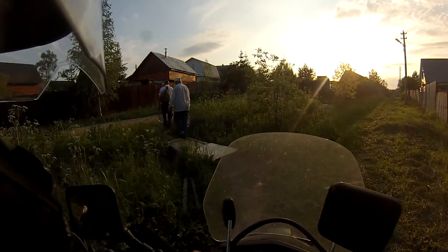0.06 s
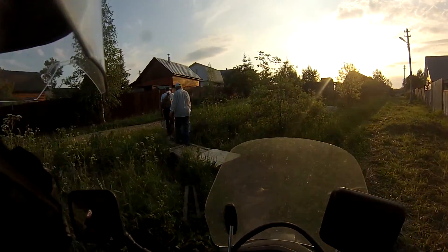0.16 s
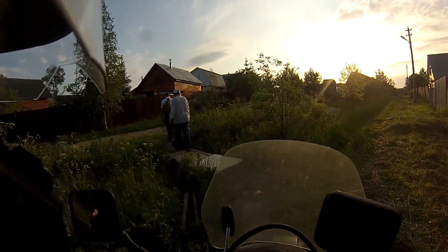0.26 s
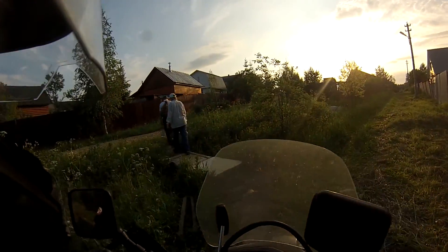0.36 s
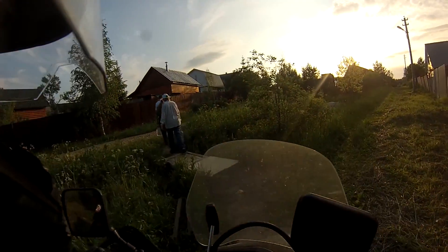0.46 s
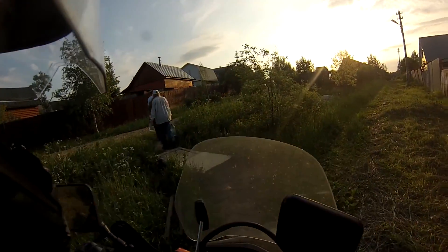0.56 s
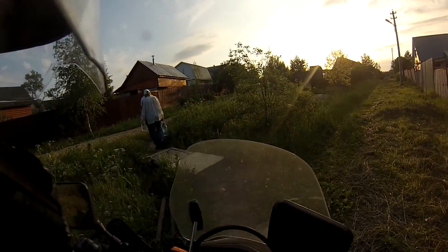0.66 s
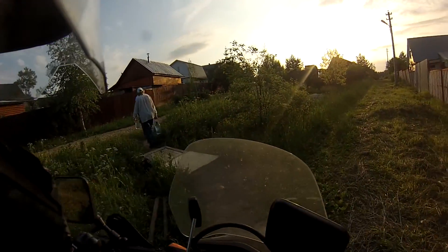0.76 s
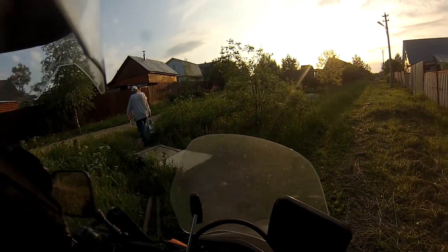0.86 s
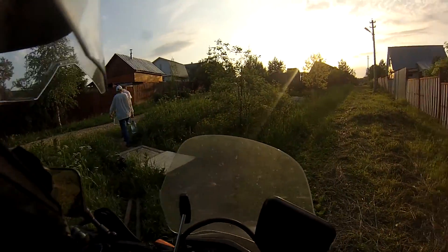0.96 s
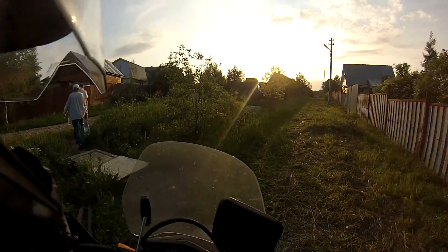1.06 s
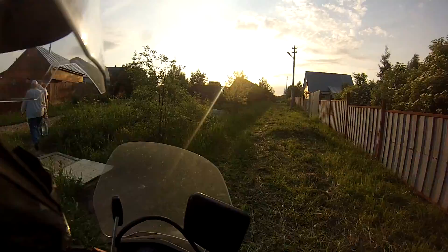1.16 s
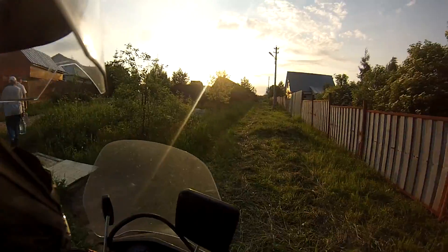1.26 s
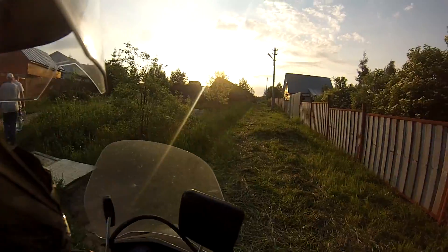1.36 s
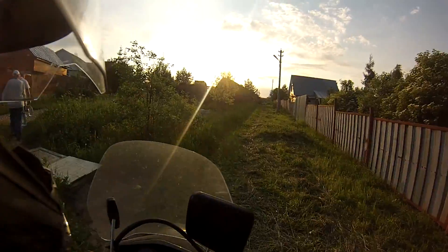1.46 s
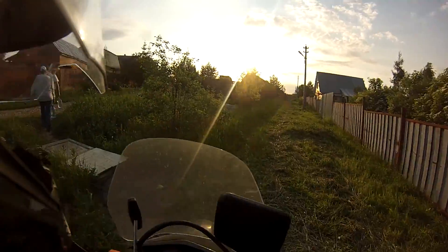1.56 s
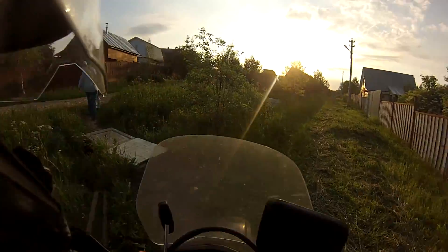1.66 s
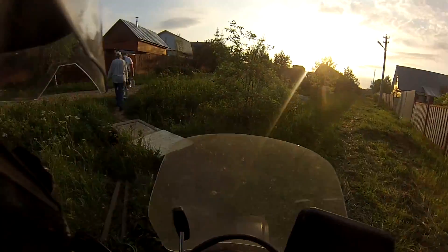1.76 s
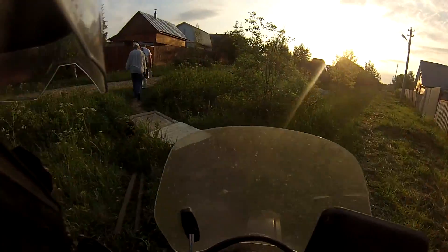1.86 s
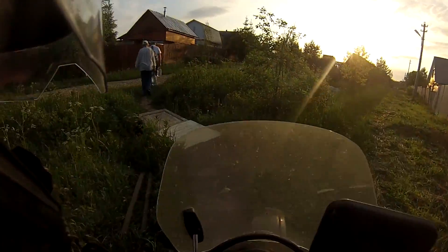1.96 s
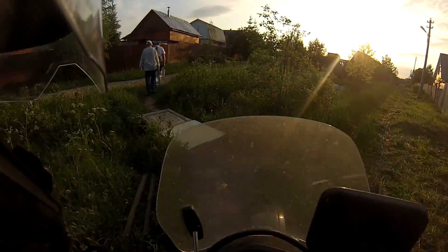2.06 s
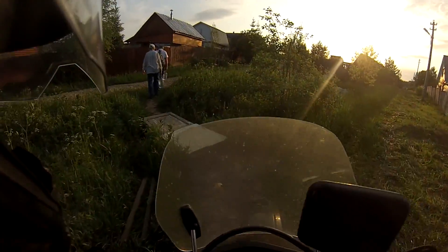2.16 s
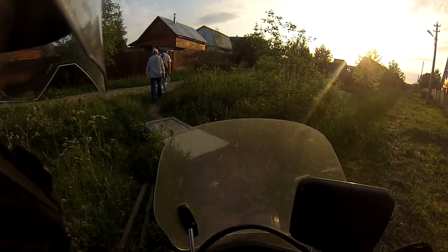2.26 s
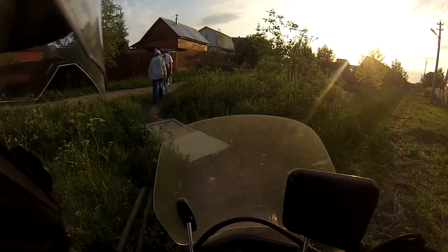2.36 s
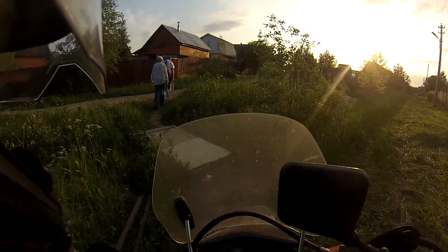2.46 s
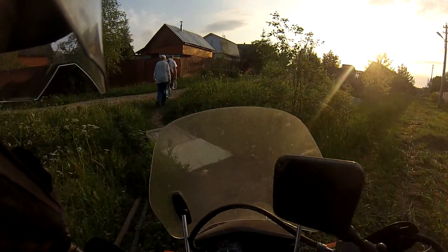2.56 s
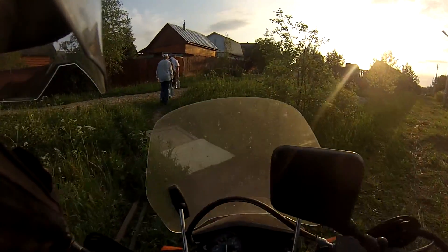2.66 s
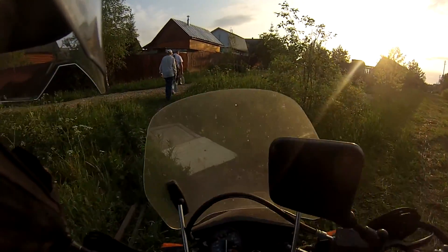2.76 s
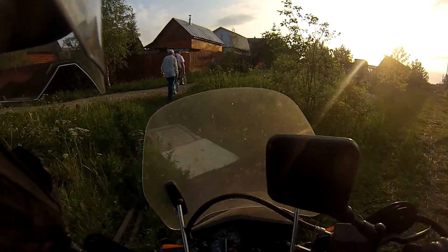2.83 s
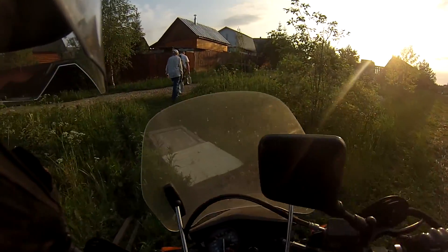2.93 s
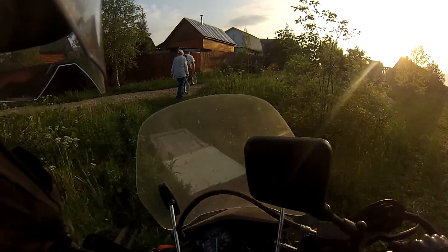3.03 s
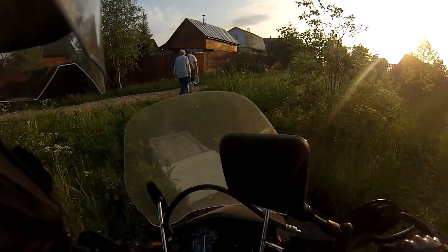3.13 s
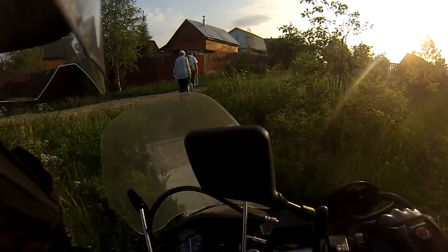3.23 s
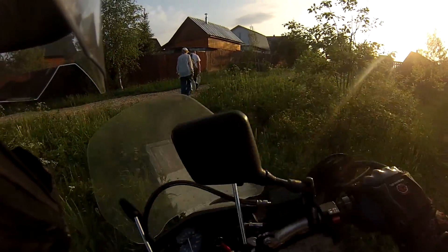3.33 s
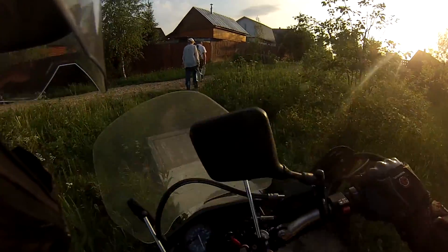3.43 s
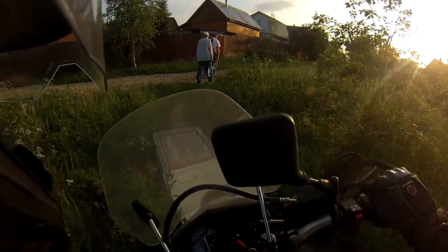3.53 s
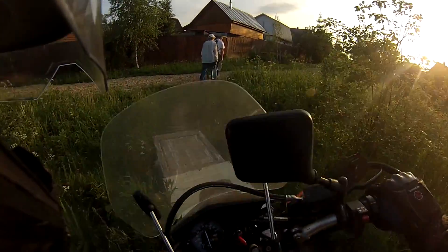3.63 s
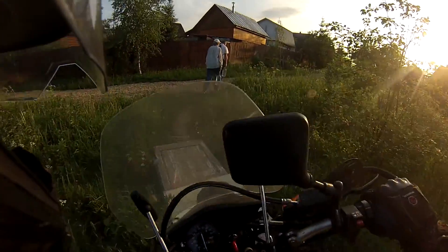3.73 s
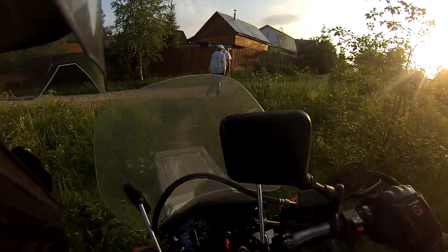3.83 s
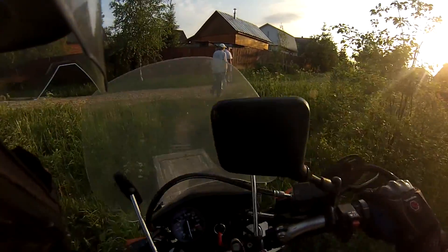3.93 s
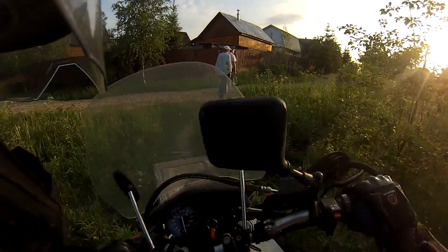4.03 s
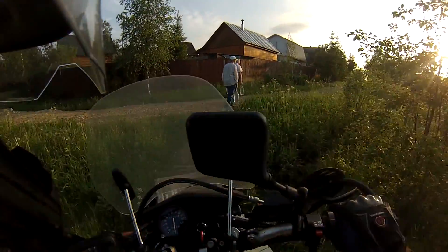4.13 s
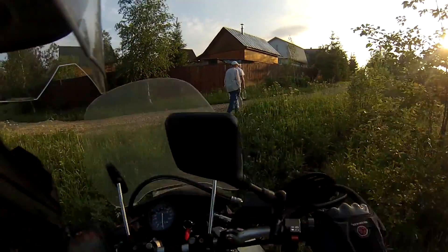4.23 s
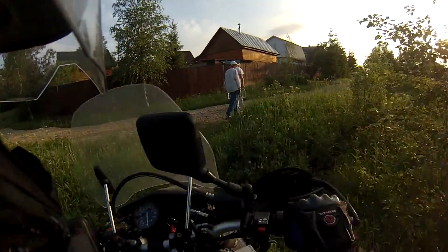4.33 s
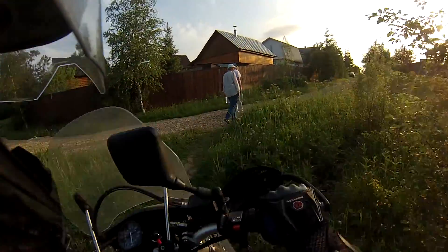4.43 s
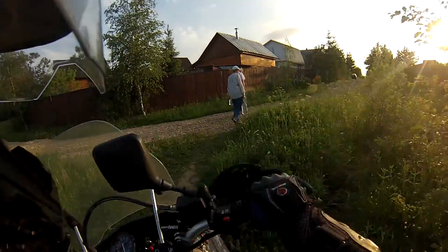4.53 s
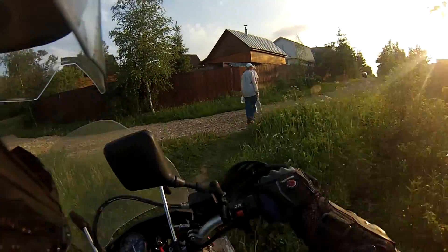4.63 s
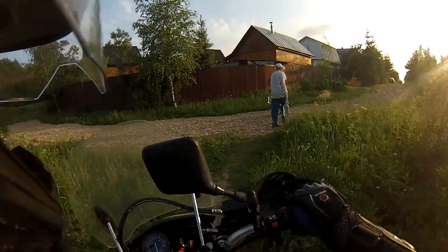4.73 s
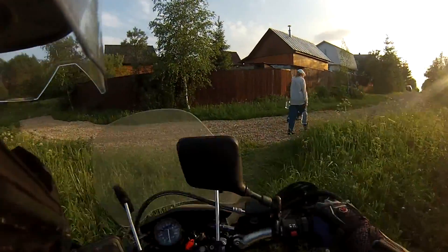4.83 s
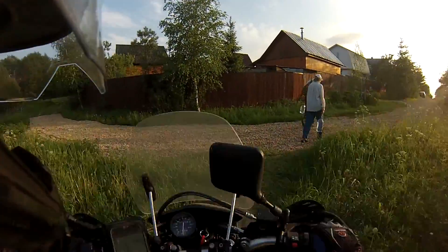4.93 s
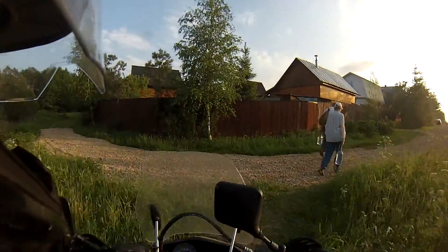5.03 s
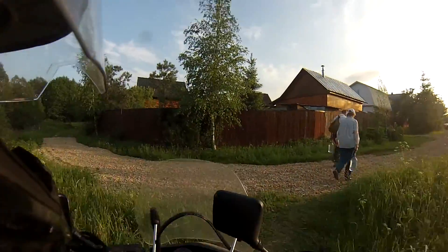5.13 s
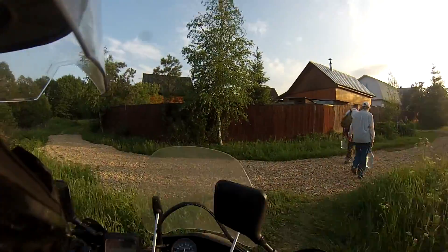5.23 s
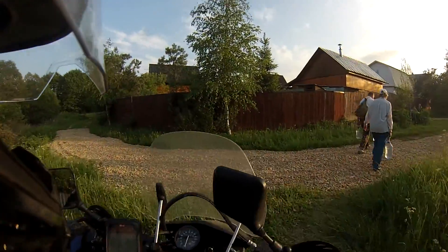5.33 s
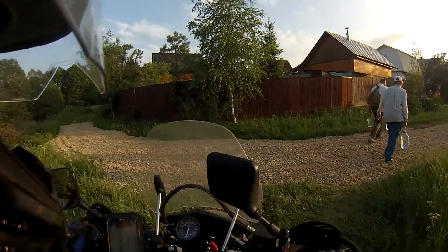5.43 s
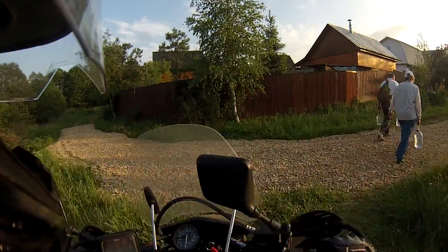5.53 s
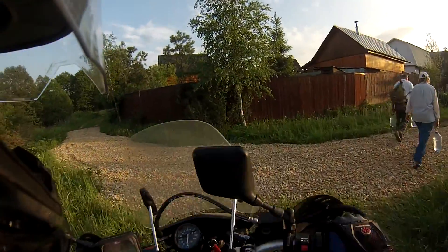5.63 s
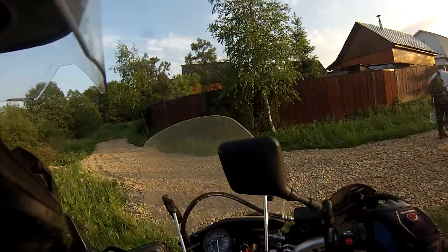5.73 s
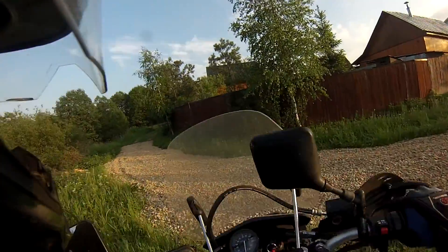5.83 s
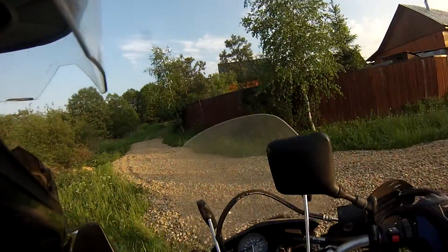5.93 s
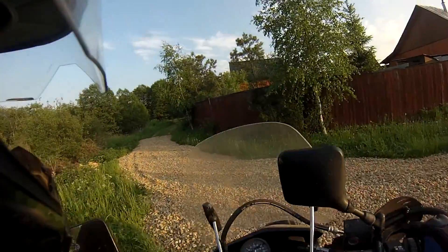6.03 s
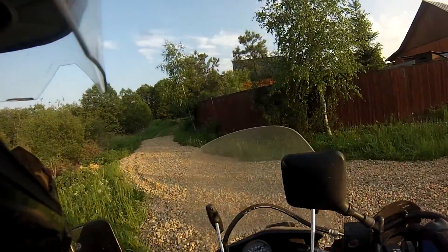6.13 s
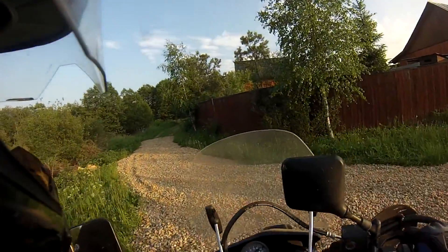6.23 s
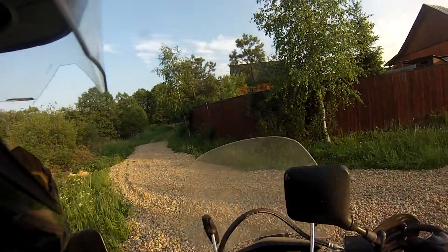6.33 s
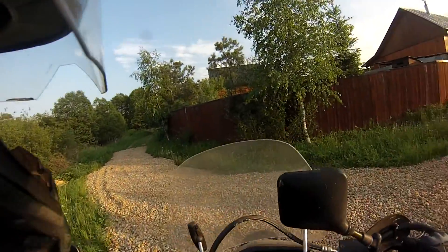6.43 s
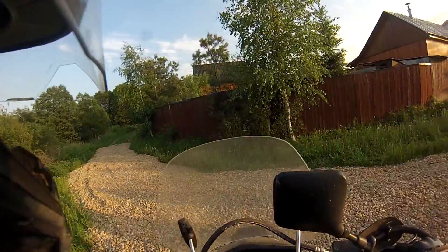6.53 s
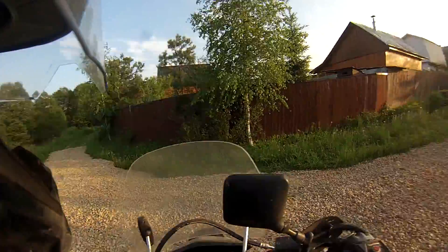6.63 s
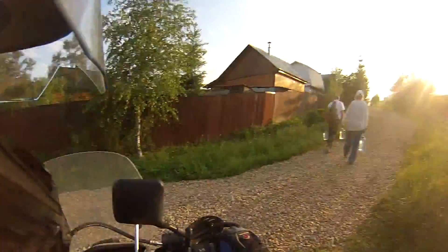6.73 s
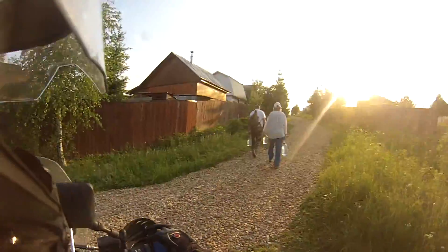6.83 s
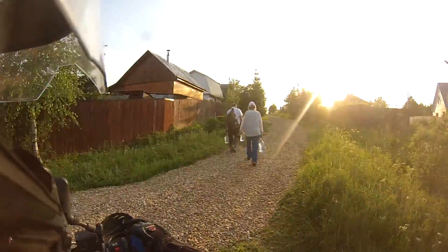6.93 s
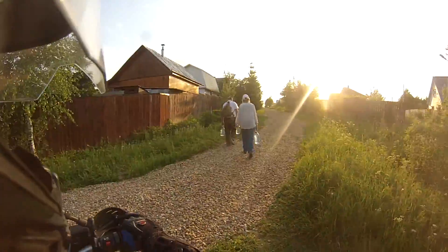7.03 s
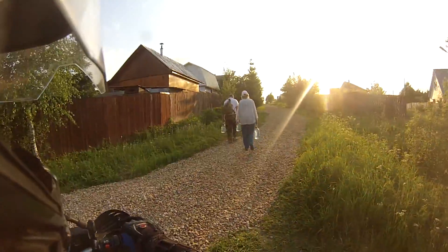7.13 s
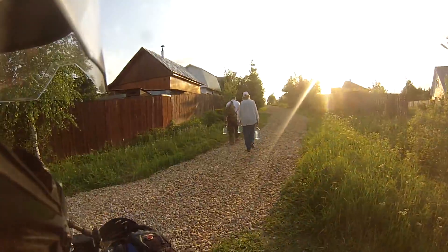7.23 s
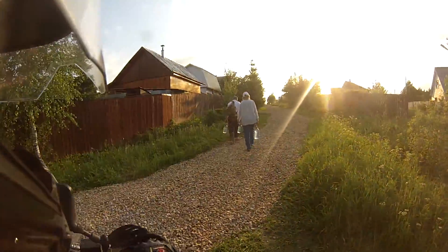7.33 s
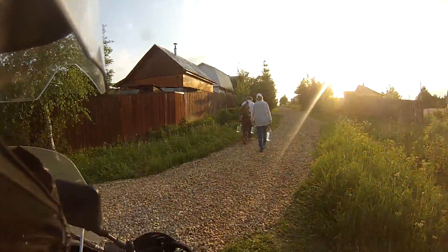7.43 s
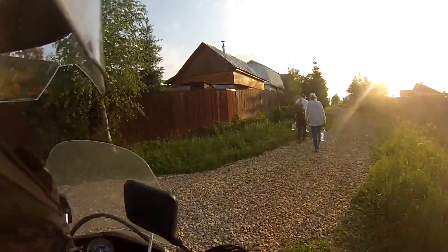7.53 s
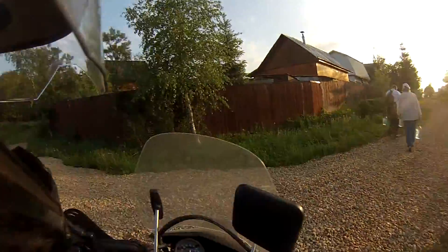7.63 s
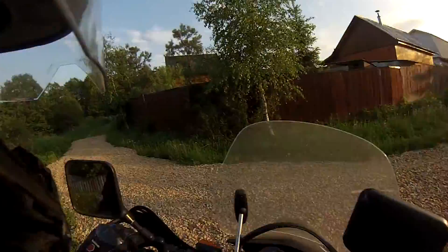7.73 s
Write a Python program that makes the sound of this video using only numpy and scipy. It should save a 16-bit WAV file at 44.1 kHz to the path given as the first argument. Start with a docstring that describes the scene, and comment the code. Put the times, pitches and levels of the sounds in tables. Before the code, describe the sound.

Close at the rider's helmet, a thumping single-cylinder engine idles, surges over rutted ground, then settles to a slow putter with two scraping brake squeezes.

```python
"""A single-cylinder four-stroke motorcycle idles over a grass track, heard close up at the rider's helmet.
It takes throttle twice to climb a bank, with thumps from the ruts, and meets gravel as the second pull begins.
It then drops below idle speed, creeps on, and is braked twice with a dry rub before rolling again.
Pulses once a cycle ring as exhaust and knock; shaped noise makes clatter, hiss, throttle roar and rub;
bumps swell a low rumble, and short blows ring the camera case as clicks."""
import sys
import numpy as np
from scipy import signal
from scipy.fft import rfft, irfft, next_fast_len
from scipy.io import wavfile
from scipy.ndimage import uniform_filter1d

SR = 44100
rng = np.random.default_rng(int(sys.argv[2]) if len(sys.argv) > 2 else 0)


def file_out(sig):
    """Save sig as 16-bit WAV at sys.argv[1]."""
    # one column per channel
    cols = np.atleast_2d(sig).T
    # limit, then scale
    lim = np.clip(cols, -1, 1)
    pcm = np.round(lim * 32767).astype(np.int16)
    wavfile.write(sys.argv[1], SR, pcm)


N = 343539
TIME = np.arange(N) / SR
IDLE_RATE = 13.7  # firings per second

# engine speed: t/s, firing rate/Hz
FIRING_RATE = [(0.0, 13.46), (0.45, 13.89), (0.8, 13.6), (1.0, 13.38), (1.25, 13.72), (1.7, 16.37),
               (1.9, 16.48), (2.2, 15.09), (2.55, 15.09), (3.05, 15.17), (3.22, 17.94), (3.44, 15.81),
               (3.56, 20.9), (3.66, 25.11), (3.78, 25.96), (3.92, 24.91), (4.1, 22.07), (4.31, 19.23),
               (4.4, 22.13), (4.5, 25.0), (4.62, 22.78), (4.77, 19.48), (4.92, 11.91), (5.2, 12.21),
               (5.45, 12.84), (5.65, 14.28), (5.95, 13.17), (6.2, 13.36), (6.5, 13.34), (6.78, 13.9),
               (7.05, 13.68), (7.5, 13.73), (7.79, 14.69)]
# load on the engine: t/s, load (0 idling, 1 pulling hard, below 0 coasting with the throttle shut)
ENGINE_LOAD = [(0, 0.1), (1.0, -0.068), (1.6, 0.55), (2.4, 0.52), (3.16, 0.62), (3.42, -0.94), (3.51, 0.79),
               (3.8, 0.58), (4.0, 0.85), (4.17, 0.92), (4.33, 0.84), (4.56, 0.73), (4.76, 0.94),
               (4.92, -0.17), (5.1, -0.12), (6.6, -0.18), (7.79, 0.11)]
# slap of the piston: t/s, level/dB before the softness correction, ring of the cylinder f/Hz
PISTON_SLAP = [(0, -49, 1580), (0.45, -49, 1530), (1.0, -59.5, 1430), (1.6, -44, 1436), (1.9, -42, 1490),
               (2.1, -42, 1490), (2.25, -37.5, 1488), (2.48, -38, 1496), (2.62, -39.5, 1507),
               (2.85, -36.5, 1503), (3.16, -39, 1507), (3.3, -57, 1400), (3.48, -47, 1450),
               (3.55, -35.5, 1514), (3.7, -42, 1456), (3.88, -42, 1480), (4.0, -37, 1500),
               (4.2, -36.5, 1520), (4.33, -39.5, 1540), (4.45, -42.5, 1490), (4.65, -47, 1460),
               (4.76, -39, 1430), (4.92, -51, 1460), (5.2, -63, 1470), (7.79, -57, 1440)]


def amp(db):
    """Decibels to gain."""
    return 10 ** (np.asarray(db) / 20)


def unit(x):
    """Scales to an rms of 1."""
    return x / np.sqrt(np.mean(x ** 2) + 1e-20)


def curves(rows):
    """Each column of a table, joined by straight lines in time."""
    s, *columns = np.transpose(rows)
    return [np.interp(TIME, s, column) for column in columns]


def read_db(points, hz):
    """A spectrum, joined by straight lines on a log axis."""
    f, db = np.transpose(points)
    return np.interp(np.log(hz + 1), np.log(f + 1), db)


def add(mix, s, sound):
    """Mixes a sound in at time s."""
    part = mix[max(round(s * SR), 0):][:len(sound)]
    part += sound[:len(part)]


def white():
    """Fresh white noise."""
    return rng.standard_normal(N)


def coloured(x, points):
    """Gives x a spectrum; rms 1."""
    size = next_fast_len(N)
    gain = amp(read_db(points, np.fft.rfftfreq(size, 1 / SR)))
    return unit(irfft(rfft(x, size) * gain, size)[:N])


def ringing(x, points, size=16384):
    """Gives pulses a spectrum causally (minimum phase), so that they ring only afterwards; rms 1."""
    log_gain = np.log(amp(read_db(points, abs(np.fft.fftfreq(size, 1 / SR)))))
    spectrum = np.exp(np.conj(signal.hilbert(log_gain)))
    response = np.fft.ifft(spectrum).real[:size // 2]
    return unit(signal.oaconvolve(x, response)[:N])


def resonate(x, hz, width):
    """A resonance of gain 1 at hz, which may move: shift down to zero, smooth, shift back."""
    turn = np.exp(2j * np.pi * np.cumsum(hz * np.ones(len(x))) / SR)
    r = np.exp(-np.pi * width / SR)
    return 2 * (turn * signal.lfilter([1 - r], [1, -r], x / turn)).real


def band(x, hz, width, order=2):
    """A fixed resonance, applied order times for steeper sides."""
    b, a = signal.iirpeak(hz, hz / width, SR)
    for _ in range(order):
        x = signal.lfilter(b, a, x)
    return x


def firing_rate():
    """Firings per second over time."""
    return curves(FIRING_RATE)[0]


def crank(start=0.57):
    """Engine cycles turned so far; the charge fires at whole numbers."""
    return start + np.cumsum(firing_rate()) / SR


def revs():
    """How far the engine is revved, 0-1: the idle colour gives way between two firing rates in Hz."""
    return np.interp(firing_rate(), (16.16, 21.4), [0, 1])


def throttle():
    """How far the throttle is open beyond a gentle pull, 0-1, read from the load."""
    return np.interp(curves(ENGINE_LOAD)[0], (0.53, 0.92), [0, 1])


def level(idle_db, load_db=0, octave_db=0):
    """Level in dB of an engine part: so much at idle, more with load and with each doubling of speed."""
    return idle_db + load_db * curves(ENGINE_LOAD)[0] + octave_db * np.log2(firing_rate() / IDLE_RATE)


def halted(start_s=6.88, end_s=7.68, fade_s=0.035):
    """1 while the bike is held almost still, 0 while it rolls."""
    return np.clip(np.minimum(TIME - start_s, end_s - TIME) / fade_s, 0, 1)


def pulses(cycle, lag, spread_db):
    """One pulse a cycle, lag cycles after the firing, each of its own strength."""
    at = np.flatnonzero(np.diff(np.floor(cycle - lag)) > 0)
    train = np.zeros(N)
    strength = amp(spread_db * rng.standard_normal(len(at)))
    train[at] = strength / np.sqrt(firing_rate()[at])  # faster firing adds no mean power
    return train


def gate(cycle, lag, length):
    """Opens lag cycles after each firing and dies away over length cycles."""
    age = (cycle - lag) % 1 / length
    return age * np.exp(1 - age)


def echoes(train, colour, decay_s):
    """Every pulse meets the same dense echoes inside a metal body: harmonics glide with the engine speed."""
    t = np.arange(SR // 12) / SR
    reflections = rng.standard_normal(len(t)) * np.exp(-t / decay_s)
    return ringing(signal.oaconvolve(train, reflections)[:N], colour)


def cylinder(train, width_hz, order):
    """Rings the finned cylinder, whose pitch drifts; rms 1."""
    ring_hz = curves(PISTON_SLAP)[1]
    for _ in range(order):
        train = resonate(train, ring_hz, width_hz)
    return unit(train)


def exhaust(cycle, idle_hz=216, rise_hz_per_firing=4.15, echo_s=0.01916, spread_db=0.4):
    """Puffs thud and echo in the silencer; the pipe barks, its pitch raised by hotter gas at speed."""
    # deep part of one pulse: f/Hz, relative level/dB at idle, relative level/dB when revving
    thud_colour = [(14.3, -32, -11), (28.6, -32, -17), (52, 8, 5.5), (70.4, 3, -27), (89.5, 2.5, 2.5),
                   (93.7, 2, -0.5), (99.3, 8.5, 5), (105, 2.5, 7), (108.6, 0.5, 7.5), (133.8, -27.5, -19),
                   (170.3, -10.5, -31), (403, -59, -73)]
    # echoes inside the silencer: f/Hz, relative level/dB
    silencer_colour = [(150, -23), (300, -20), (375, -7), (440, 1.5), (540, 0), (700, -12), (1000, -10),
                       (1500, -7.5), (3000, -35)]
    # slow swells of the exhaust bark: t/s, level/dB
    bark_swell = [(0, -5), (1.3, -0.5), (3.1, -2), (3.6, 1.5), (4.1, 0.5), (4.45, 0), (4.79, 0),
                  (4.88, -10.5), (5.2, -1.5), (6.5, 0.5), (7.79, 1.5)]
    rev = revs()
    thud_db = level(idle_db=-42.0, load_db=5.5)
    bark_db = level(idle_db=-57.5, load_db=6.0, octave_db=5.5) + curves(bark_swell)[0]

    puffs = pulses(cycle, lag=0.191, spread_db=spread_db)
    idling = ringing(puffs, [(hz, db) for hz, db, _ in thud_colour])
    pulling = ringing(puffs, [(hz, db) for hz, _, db in thud_colour])
    thud = (1 - rev) * idling + rev * pulling

    pipe_hz = idle_hz + rise_hz_per_firing * (firing_rate() - IDLE_RATE)
    cracks = pulses(cycle, lag=0.1565, spread_db=spread_db)
    pipe = unit(resonate(resonate(cracks, pipe_hz, 47), pipe_hz, 106))
    bark = pipe - amp(-8.0) * unit(band(cracks, 175.0, 69))
    echo = amp(-27.0) * (1 - rev) * np.interp(TIME - echo_s, TIME, bark)

    blowdown = pulses(cycle, lag=0.33, spread_db=spread_db)
    rasp = amp(-16 + 9.5 * rev) * echoes(blowdown, silencer_colour, decay_s=0.01)
    return amp(thud_db) * thud + amp(bark_db) * (bark + echo + rasp)


def knock(cycle, hard_db=-40, cover_hz=2170, spread_db=1.2):
    """Combustion thumps the block and slaps the piston once a cycle: ring, rebounds, rattling tail."""
    # colour of the engine block: f/Hz, relative level/dB
    block_colour = [(200, -31), (420, -2.5), (560, -0.5), (760, -1), (1000, -6), (1400, -8.5), (2500, -26),
                    (5000, -41)]
    knock_db, rev = curves(PISTON_SLAP)[0], revs()
    softness = np.clip(hard_db - knock_db, 0, 15)  # dB; a soft slap leaves mostly the tail

    slaps = pulses(cycle, lag=-0.054 - 0.0345 * rev, spread_db=spread_db)
    rebounds = amp(-10.0) * pulses(cycle, lag=0.09, spread_db=spread_db)
    rebounds = rebounds + amp(-9) * rev * pulses(cycle, lag=0.28, spread_db=spread_db)
    ring = cylinder(slaps + rebounds, width_hz=236, order=4)
    ring = ring + amp(-7.0) * throttle() * unit(band(slaps, cover_hz, 104, order=3))

    tail = unit(band(white() * (gate(cycle, lag=0.12, length=0.13) + 0.17), 1453, 216))
    thumps = pulses(cycle, lag=-0.0796, spread_db=spread_db)
    block = echoes(thumps, block_colour, decay_s=0.0044)

    out = amp(knock_db - 9.0 - 0.76 * softness) * ring
    out = out + amp(knock_db - 14.0 + 0.54 * softness) * tail
    return out + amp(level(idle_db=-68.5, octave_db=11)) * block


def clatter(cycle, valve_hz=2150, rise_hz=65, tap_spread_db=1.5):
    """Valves and gears tap the cases twice a cycle over a gas rush; throttle and revs ring the valve cover."""
    # ringing of the cylinder and cases: f/Hz, half the width/Hz of each filter pass, relative level/dB
    case_modes = [(559, 58, 0.5), (750, 35, 7.5), (970, 82, -3), (1303, 131, 6.5), (1437, 62, 5.5),
                  (2273, 117, -1), (2600, 210, -24), (3094, 145, -8.5)]
    # gas rush and tyres: f/Hz, relative level/dB per Hz
    rush_colour = [(120, 1.5), (300, 0.5), (390, -5.5), (480, -3.5), (620, -13), (800, -8.5), (1100, -5),
                   (1500, -4), (1900, -17), (2600, -14), (3600, -18.5), (8000, -57)]
    rev = revs()
    clatter_db = level(idle_db=-61.5, octave_db=7.5) - 3 * halted()

    beat = 0.81 * gate(cycle, lag=-0.057, length=0.043) + 1.18 * gate(cycle, lag=0.428, length=0.035)
    cycle_strength = amp(3.4 * rng.standard_normal(int(cycle[-1]) + 1))
    beat = beat * cycle_strength[cycle.astype(int)]  # no two cycles rattle alike
    taps = white() * amp(tap_spread_db * np.minimum(rng.exponential(1, N), 4))
    cases = unit(sum(amp(db) * band(taps * (0.5 + beat), hz, 2 * width) for hz, width, db in case_modes))

    cover_hz = valve_hz + rise_hz * rev
    cover = unit(resonate(resonate(white() * (0.43 + beat), cover_hz, 150), cover_hz, 150))
    rush = coloured(white() * (1 + 1.5 * gate(cycle, lag=0.352, length=0.035)), rush_colour)

    parts = amp(3.5 - 1.3 * rev) * cases
    parts = parts + amp(-6.5 + 10 * np.maximum(rev, throttle())) * cover
    parts = parts + amp(5.5 - 0.32 * rev) * rush
    return amp(clatter_db) * parts


def hiss(cycle):
    """Chain and grass hiss, more at speed and over bumps; a thin valve-seat tick; steady high background noise."""
    # fine hiss of chain and grass: f/Hz, relative level/dB per Hz
    hiss_colour = [(1000, -22), (2800, 3), (3700, -0.5), (4900, 5.5), (5900, 1.5), (6600, 2), (8500, -8),
                   (12000, -24), (15500, -38)]
    grains = white() * amp(2.1 * np.minimum(rng.exponential(1, N), 4))
    grains = grains * (1 + 0.75 * gate(cycle, lag=0.53, length=0.027))
    tick = unit(band(white() * gate(cycle, lag=0.67, length=0.064), 10090, 1000))
    floor_colour = [(3000, -5.5), (9000, -1.5), (12500, 0.0), (14300, 3.0), (15400, -2.5)]
    floor = coloured(white(), floor_colour)
    speed_gain = amp(level(idle_db=-66.5, octave_db=11.0) - 9.3 * halted())
    rolling = np.hypot(speed_gain, amp(-70.0) * jolts())
    return rolling * coloured(grains, hiss_colour) + amp(-81.5) * tick + amp(-68.5) * floor


def whine(mesh_order=82, whine_db=-75, width_hz=65):
    """Gear teeth sing faintly on overtones of their meshing rate, following the engine speed."""
    mesh_hz = mesh_order * firing_rate()
    tones = 0
    for k in (4, 5):
        tones = tones + resonate(resonate(white(), k * mesh_hz, width_hz), k * mesh_hz, width_hz)
    return amp(whine_db - 11 * halted() - 10 * revs()) * unit(tones)


def swell(s, length):
    """A smooth rise and fall around time s."""
    return np.exp(-(2 * (TIME - s) / length) ** 2)


def jolts():
    """Strength of the bumps over time, overlapping bumps adding in power."""
    # bumps that jolt the camera: t/s, level/dB, length/s
    bumps = [(0.412, -34.5, 0.084), (0.903, -39, 0.13), (3.296, -26.5, .08), (3.398, -24.5, 0.1),
             (4.27, -29, 0.07), (4.352, -20.5, 0.074), (4.452, -20.5, 0.1), (4.68, -24.5, 0.18),
             (5.174, -30.5, 0.084), (5.34, -37, 0.31), (5.845, -32, 0.38), (6.387, -33.5, 0.27),
             (6.822, -35, 0.14), (7.64, -37, 0.3)]
    return np.sqrt(sum((amp(db) * swell(s, length)) ** 2 for s, db, length in bumps))


def shake(grass_db=-47.0, gravel_db=-41, rev_db=6, gravel_s=4.3):
    """Ground sways the helmet, more on gravel and at speed; bumps press air into the camera case."""
    # spectrum of the shaking: f/Hz, relative level/dB per Hz
    rumble_colour = [(6, -14), (16, -3), (27, -2.5), (42, -11), (60, -19), (90, -23.5), (150, -51),
                     (300, -46), (900, -99)]
    ground = amp(np.where(TIME < gravel_s, grass_db, gravel_db) + rev_db * revs())
    return np.hypot(ground, jolts()) * coloured(white(), rumble_colour)


def scuffs(breadth=0.94):
    """Brief gritty scuffs and rattles: band noise under a smooth swell."""
    # scuffs and rattles: t/s, level/dB, centre f/Hz, length/s
    brushes = [(0.391, -50.5, 2270, 0.012), (3.51, -47.5, 2200, 0.014), (4.638, -39, 700, 0.0057),
               (5.11, -52.5, 7400, 0.014), (5.145, -51, 2880, 0.004), (5.171, -50, 435, 0.011),
               (5.586, -47, 990, 0.0075), (6.157, -56.5, 3670, 0.02), (6.309, -56, 2760, 0.008),
               (6.735, -46, 1290, 0.0043)]
    out, t = np.zeros(N), np.arange(-SR // 20, SR // 20) / SR
    for s, db, hz, length in brushes:
        grit = unit(band(rng.standard_normal(len(t)), hz, breadth * hz))
        add(out, s + t[0], amp(db) * grit * np.exp(-(2 * t / length) ** 2))
    return out


def clicks(chatter_s=0.0037, contact_hz=7000, creep=0.031, creep_s=0.0027,
           bounce_s=0.00012, bounce_db=-5.5, ring_db=3.5):
    """The case shifts in its mount: it creeps, cracks and bounces twice, ringing its modes over a low push."""
    # clicks of the camera case: t/s, click peak level/dB, low push level/dB, push length/s,
    # bounce interval/s, main ring f/Hz, its width/Hz, dulled above f/Hz, chatter strength (0-1)
    case_clicks = [(0.4988, -18.5, -28.5, 0.0011, 0.00079, 1330, 300, 8500, 0.06),
                   (3.2096, -21.5, -18, 0.0029, 0.00065, 1920, 220, 5600, 0.1),
                   (4.2597, -16, -18.5, 0.0015, 0.00078, 1630, 1100, 2850, 0.09),
                   (4.335, -22, -18.5, 0.0025, 0.00043, 2260, 70, 2200, 0.02),
                   (5.1377, -17, -20.5, 0.00091, 0.00067, 2690, 111, 4850, 0.03),
                   (7.6338, -12, -16.5, 0.0035, 0.00089, 1460, 1100, 3480, 0.06)]
    # modes of the camera case: f/Hz, width/Hz, relative level/dB
    housing_modes = [(505, 580, 0), (1320, 640, -2.5), (2130, 61, -8), (2600, 127, -4.5), (4630, 630, -7.5),
                     (7400, 3200, -6.5), (14000, 2800, 5)]
    # bounces after the crack: time/bounce intervals, share of the bounce strength
    bounce_shares = [(1, 0.7), (2, 0.3)]
    out, t = np.zeros(N), np.arange(-SR // 200, SR // 16) / SR
    after = np.maximum(t, 0)
    for s, click_db, push_db, push_s, gap_s, ring_hz, width_hz, dull_hz, chatter in case_clicks:
        creeping, chattering = creep * np.exp(-abs(t) / creep_s), chatter * np.exp(-after / chatter_s)
        grit = rng.standard_normal(len(t)) * np.where(t < 0, creeping, chattering)
        bounces = sum(share * np.exp(-((t - k * gap_s) / bounce_s) ** 2) for k, share in bounce_shares)
        bounces = bounces / (np.sqrt(np.pi) * bounce_s * SR)
        blow = (t == 0) + grit + amp(bounce_db) * bounces
        # plastic yields a little on contact
        blow = signal.lfilter(*signal.butter(1, contact_hz, fs=SR), blow)

        ring = sum(amp(db) * band(blow, hz, width, order=1) for hz, width, db in housing_modes)
        ring = ring + amp(ring_db) * band(blow, ring_hz, width_hz, order=1)
        ring = signal.lfilter(*signal.butter(2, dull_hz, fs=SR), ring)
        age = after / push_s
        push = age * np.exp(1 - age) * (1 - age / 4)
        add(out, s + t[0], amp(click_db) * ring / abs(ring).max() + amp(push_db) * push)
    return out


def intake(cycle, roar_db=-50):
    """Air roars through the carburettor, swelling once a cycle, about a quarter cycle after firing."""
    # roar of the open throttle: f/Hz, relative level/dB per Hz
    roar_colour = [(200, -23), (500, 0.5), (900, -17), (1250, -1), (1550, 9), (1850, -7.5), (2200, -3),
                   (2600, -6.5), (3400, -16.5), (6000, -16.5), (10000, -45)]
    air = white() * (1 + 0.5 * gate(cycle, lag=0.16, length=0.11))
    return amp(roar_db) * throttle() * coloured(air, roar_colour)


def clunks():
    """Deep frame thumps over ruts and short hollow knocks, some sliding in pitch, loudest topping the bank."""
    # knocks of the frame: t/s, level/dB, f/Hz at the centre, glide/Hz per s, length/s
    frame_knocks = [(3.361, -22.5, 21.1, 0, 0.063), (3.435, -19.5, 22.2, 0, 0.056),
                    (4.402, -31.5, 237, 0, 0.011), (4.643, -33, 350, -8000, 0.0055),
                    (4.657, -35, 423, 9000, 0.0088), (4.6573, -41, 1010, 0, 0.008),
                    (4.664, -32.5, 616, 12000, 0.01), (4.666, -34, 284, 0, 0.024),
                    (4.69, -17.5, 27, 0, 0.05), (5.777, -28, 27, 0, 0.028), (5.876, -22, 28, 0, 0.038),
                    (5.936, -25, 27, 0, 0.05), (6.092, -26, 24, 0, 0.037), (6.407, -21, 23, 0, 0.043),
                    (6.776, -26, 35, 0, 0.022), (7.072, -24, 62, -1000, 0.015)]
    out, t = np.zeros(N), np.arange(-SR // 20, SR // 20) / SR
    for s, db, hz, glide, length in frame_knocks:
        tone = np.sin(2 * np.pi * (hz + glide * t / 2) * t)
        add(out, s + t[0], amp(db) * np.exp(-(2 * t / length) ** 2) * tone)
    return out


def brake(groan_db=-41.5, rasp_db=-53.0, squeal_db=-47, groan_power=0.52, rasp_power=2.2,
          sag_hz_per_s=60, waver_hz=25, release_s=0.016):
    """Pads rub the dusty disc: groan and a wavering, sinking note from light pressure, a rasp as they bite."""
    # squeezes: start t/s, time to full pressure/s, let go at t/s, starting note f/Hz
    squeezes = [(6.787, 0.016, 6.975, 1344), (7.244, 0.23, 7.55, 1277)]
    # colours of the rub: f/Hz, relative level/dB per Hz
    groan_colour = [(300, -11.5), (480, -19.5), (590, -10.5), (750, -28), (1050, -16), (1270, 1.5),
                    (1400, 0.5), (1700, -16.5), (2250, -17.5), (2750, -28), (3300, -54), (6000, -63)]
    rasp_colour = [(1500, -21), (2650, -6), (3500, -10), (4200, 0.5), (4700, 11), (5800, -1.5), (6750, 9),
                   (7500, -10), (9000, -25), (11000, -17), (11700, 0.5), (12400, -11), (13200, -26)]
    slips = white() * amp(1.0 * unit(uniform_filter1d(white(), size=200)))
    groan, rasp, out = coloured(slips, groan_colour), coloured(slips, rasp_colour), np.zeros(N)
    waver = waver_hz * unit(uniform_filter1d(white(), size=2000))
    for start, rise, end, hz in squeezes:
        pressure = np.clip((TIME - start) / rise, 0, 1)
        contact = np.clip(1 - (TIME - end) / release_s, 0, 1)
        note_hz = hz + waver - sag_hz_per_s * np.clip(TIME - start, 0, end - start)
        note = unit(resonate(resonate(slips, note_hz, 98), note_hz, 98))
        light = pressure ** groan_power * (amp(groan_db) * groan + amp(squeal_db) * note)
        bite = amp(rasp_db) * pressure ** rasp_power * rasp
        out += contact * (light + bite)
    return out


def scene():
    """The engine, the ride and the brake, all at the rider's helmet."""
    cycle = crank()
    engine = exhaust(cycle) + knock(cycle) + clatter(cycle) + hiss(cycle) + whine() + intake(cycle)
    ride = shake() + scuffs() + clicks() + clunks()
    return (engine + ride + brake())[None]


def record(dry, edge_hz=15400):
    """The camera microphone's band limit: a steep low-pass."""
    lowpass = signal.firwin(511, edge_hz, window=("kaiser", 9), fs=SR)
    return signal.oaconvolve(dry, lowpass[None], "same")


dry = scene()
out = record(dry)
file_out(out)
```